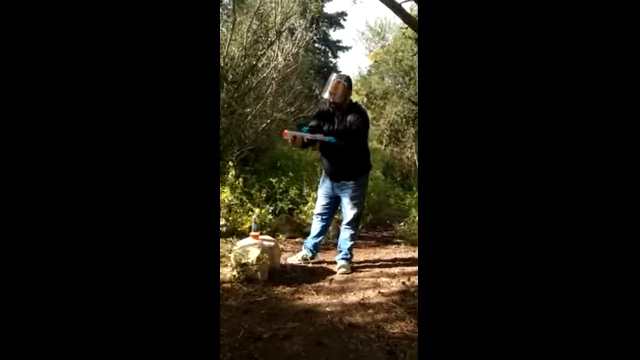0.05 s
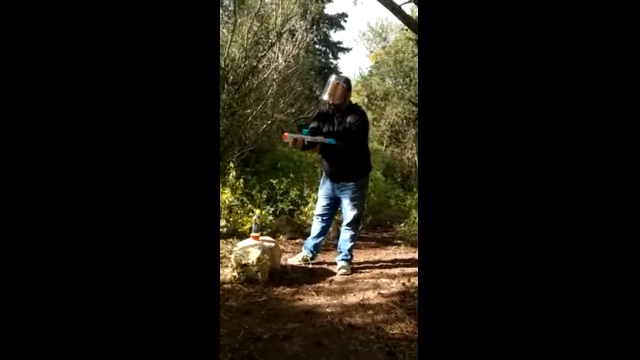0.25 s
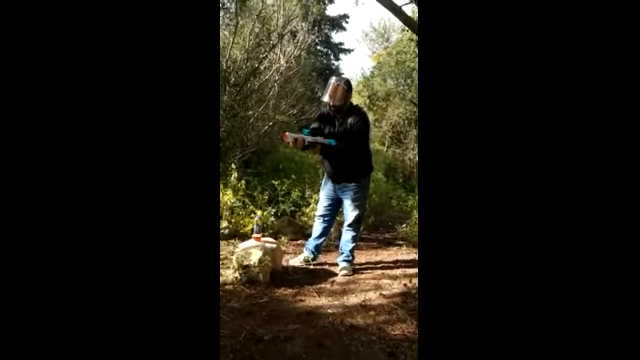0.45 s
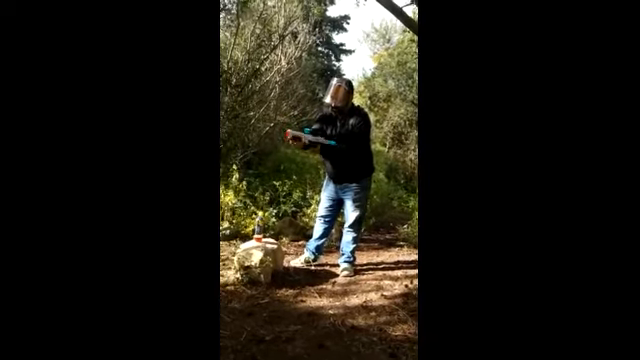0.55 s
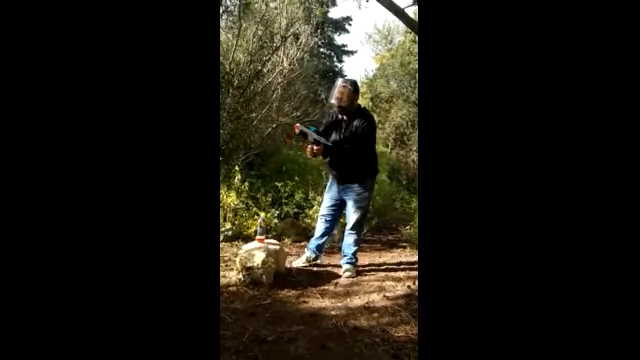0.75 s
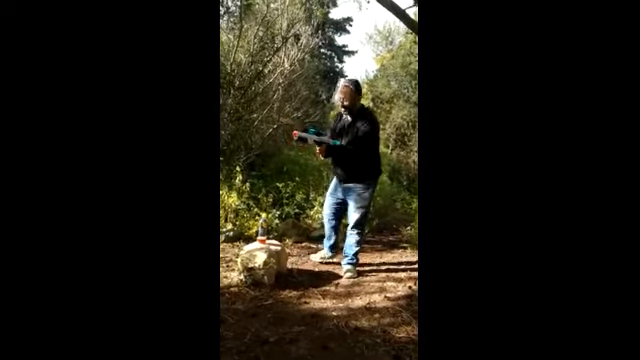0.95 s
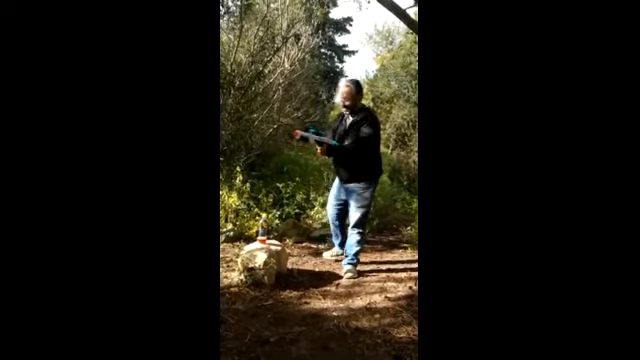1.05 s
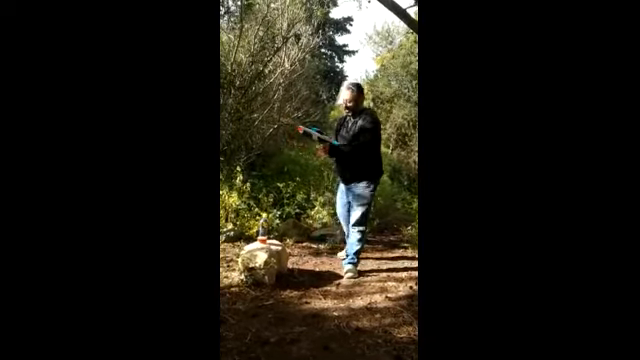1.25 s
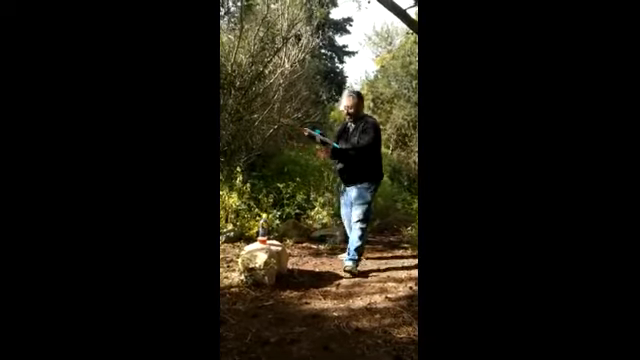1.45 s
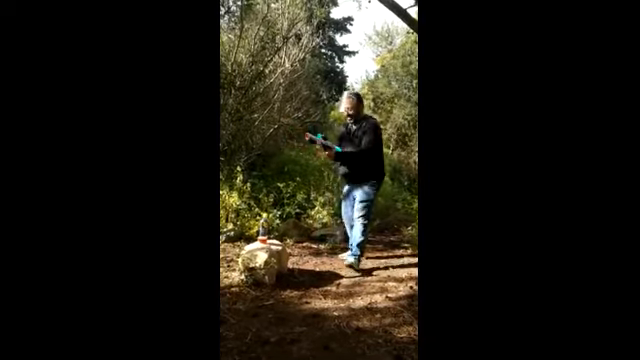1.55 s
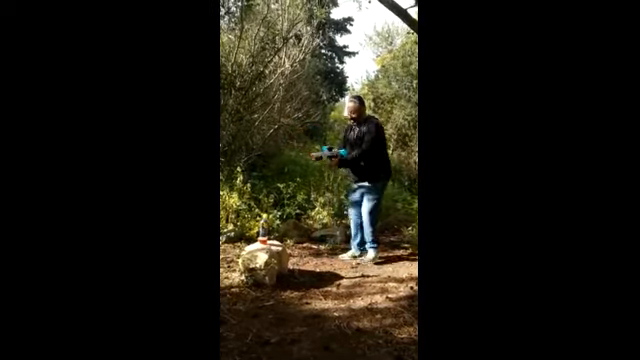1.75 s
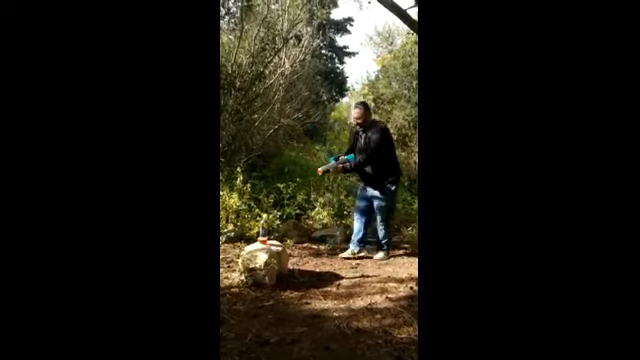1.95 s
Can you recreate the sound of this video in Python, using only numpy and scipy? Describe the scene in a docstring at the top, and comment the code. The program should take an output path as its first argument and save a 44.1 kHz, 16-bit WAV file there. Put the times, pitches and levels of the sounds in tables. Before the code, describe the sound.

A plastic toy shotgun is worked outdoors. Small clicks at 0.1 s lead to a bright latch snap at 0.32 s, then light clicks to 0.56 s. A hard slam at 0.78 s rattles until 0.85 s; softer hollow knocks follow around 1.0 and 1.35 s. Dry ticks come near 0.08, 1.13 and 1.6 s. Wind rumbles mainly left, over faint leaf hiss and bird chirps near 0.6 and 1.65 s.

```python
"""Impact and scattering of a toy shotgun in a garden

A plastic toy shotgun is loaded and worked: a latch snaps, the action slams shut, loose parts rattle.
Each impact is decaying noise with a contact spectrum; damped modes ring the hollow shell and knock the grip,
and a noise tail scatters each snap from the trees. Gust-shaped noise buffets mainly the left microphone port,
with pressure thumps and small dry ticks close by; a faint bird of gliding sines chirps over leaf hiss."""
import sys
import numpy as np
from scipy import signal
from scipy.fft import rfft, irfft
from scipy.io import wavfile
from scipy.ndimage import uniform_filter1d

SR = 44100
rng = np.random.default_rng(int(sys.argv[2]) if len(sys.argv) > 2 else 0)


def master(y):
    """Save y as 16-bit WAV."""
    cut = np.clip(np.atleast_2d(y).T, -1, 1)
    pcm = np.round(cut * 32767)  # scale
    wavfile.write(sys.argv[1], SR, pcm.astype(np.int16))


N = 88200
T, HZ = np.arange(N) / SR, np.fft.rfftfreq(N, 1 / SR)

# Hiss of leaves: spectrum (frequency [Hz], relative level [dB])
LEAVES_SPECTRUM = [(30, 7.5), (150, 4), (300, -3), (480, 0), (4800, -10.5), (6500, -14.5), (15500, -19)]
# Course of the hiss (time [s], level [dB])
LEAVES_LEVEL = [(0, -49.5), (.5, -52.5), (1.85, -52), (1.97, -55.5)]
# Likeness of the hiss in the two channels (frequency [Hz], left-right correlation [-1 to 1])
LEAVES_LIKENESS = [(100, 0.71), (700, 0.67), (1500, 0.15), (3200, -0.46), (6000, 0.68), (12000, 1)]
LEAVES_BALANCE_DB = 0.5  # left minus right

# Wind on each port (time [s], left level [dB], right level [dB])
GUST_LEVELS = [(0, -27.5, -41), (.12, -38.5, -52), (0.218, -27, -43), (.32, -33.5, -46), (.42, -31.5, -45),
               (.55, -28, -45), (0.691, -29.5, -48), (.73, -38, -38.5), (.79, -30.5, -43.5),
               (0.942, -43.5, -44), (1.048, -27.5, -45.5), (1.15, -44.5, -51), (1.22, -29, -42),
               (1.28, -36, -50), (1.33, -33, -36), (1.46, -42.5, -47.5), (1.551, -38, -34),
               (1.64, -44, -47), (1.88, -41, -45.5), (2., -49.5, -49)]
# Spectrum of the eddies at the reference level (frequency [Hz], relative level [dB])
WIND_SPECTRUM = [(10, -8), (25, -3.5), (50, 1), (80, -5), (120, -9), (170, -26.5), (250, -43), (400, -50),
                 (1000, -97), (3000, -101)]
WIND_REFERENCE_DB, WIND_OCTAVES_PER_DB = -30, 0.1047  # stronger gusts make smaller, faster eddies
# Single thumps of air or grip on the microphone
# (time [s], level [dB], time scale [s], left minus right [dB])
PRESSURE_THUMPS = [(.42, -31.5, 0.0053, 12), (.678, -32, 0.0084, 20), (1.0915, -30, 0.0034, 17.5)]

# Decay of the scatter (frequency [Hz], 60 dB decay time [s])
TREES_DECAY = [(800, 0.25), (15000, 0.21)]
# Spectrum sent out in all directions and scattered back (frequency [Hz], relative level [dB])
TREES_SPECTRUM = [(100, -45), (300, -21), (500, -20), (750, -11), (1200, -7), (1700, -10.5), (2200, -1),
                  (3400, -8.5), (4800, -6), (7500, -7.5), (10000, -11), (15000, -18.5)]
# Likeness of the scatter in the two channels (frequency [Hz], left-right correlation [-1 to 1])
TREES_LIKENESS = [(200, 0.61), (1400, 0.7), (3100, 0), (6500, 1), (12000, 1)]
TREES_PATCHY_DB, TREES_ONSET_S = 3, 0.0023  # rms unevenness, build-up time

# Bird notes (time [s], length [s], start frequency [Hz], end frequency [Hz], level [dB], waver [Hz])
BIRD_NOTES = [(0.589, 0.022, 4800, 4150, -51, 150), (0.616, 0.024, 4480, 3760, -51.5, 150),
              (0.643, 0.032, 4100, 3710, -54.5, 400), (1.639, .05, 4710, 4270, -57.5, 590),
              (1.673, 0.062, 4500, 3890, -58, 990)]
BIRD_SCATTER_DB = 5

# Dry ticks close to the microphone (time [s], level [dB], ring frequency [Hz], ring 60 dB decay time [s],
# crack relative level [dB], thud relative level [dB], left minus right [dB])
DRY_TICKS = [(0.0787, -25.5, 1680, 0.0095, -18, -16, 8), (1.1013, -39.5, 797, 0.028, -9, -8, 5),
             (1.1010, -40, 310, 0.031, -28, -10, -1), (1.1346, -30, 7170, 0.0085, -9, -12.5, 10),
             (1.6043, -29.5, 1276, 0.013, -24, -4.5, 5), (1.6463, -41, 905, 0.0082, -24, -5, 17),
             (1.724, -36, 1230, 0.0063, -18, -2, 1)]
TICK_RISE_S, CRACK_T60_S = 0.0005, 0.008

# Knocks of the sliding grip (time [s], level [dB], tilt [dB per octave])
GRIP_KNOCKS = [(0.3735, -48, -2), (1.009, -44.5, -4), (1.0134, -42, -2), (1.0205, -40, -8),
               (1.033, -43.5, 5), (1.321, -43.5, -2), (1.3566, -45, 1), (1.365, -42.5, -3), (1.381, -49, 1)]
# Low modes of the hollow body, struck by the grip (frequency [Hz], relative level [dB], 60 dB decay time [s])
BODY_MODES = [(747, -2, 0.045), (962, -1, 0.032), (1155, 2, 0.031), (2056, -3.5, 0.047)]

# Plastic parts striking each other (time [s], relative level [dB], time to fall 60 dB [s],
# sound from latch to slam [0 to 1], tilt [dB per octave], scatter relative level [dB])
IMPACTS = [(0.1112, -1, 0.023, 0.54, -3, -6.5), (0.154, -9, 0.018, 0.4, -2.5, -12),
           (0.3195, 2.5, 0.014, 0.87, 1, -17), (0.3225, 20, 0.018, 0.017, 0.5, -14),
           (0.3375, -3, .012, .1, 1, -8), (0.374, -7.5, 0.022, 0.44, -3.5, -19),
           (0.4695, -8, 0.017, 0.21, -3.5, -12), (0.531, -8, 0.035, 0.25, -5.5, -10),
           (0.5602, 0.5, 0.03, 0.073, 0, -11), (0.711, -8.5, 0.073, 0.12, -4, -3),
           (0.7397, 6, .018, 0.46, -3, -5.5), (0.7650, 5, 0.048, 0, -2, 3),
           (.7758, 22, 0.018, 0.85, 1.5, -10), (.7776, 19, 0.017, 0.94, -1, -6),
           (0.798, 6, 0.01, 0.7, 1, -6), (0.8022, 3.5, 0.02, 0.6, 0.5, -5),
           (0.809, 1, 0.02, .7, -0.5, -4.5), (0.824, -2, 0.012, .5, -0.5, -3),
           (0.8337, -1.5, 0.017, 0.75, 0.5, -3), (0.8393, -3, .012, 0.63, -1, -4.5),
           (0.8494, -7, 0.011, 0.63, -1, -6), (1.009, -3.5, 0.03, 0.43, -3.5, -6),
           (1.0134, -1, 0.028, 0.42, -1, -4.5), (1.02, -1.5, 0.032, .3, 0, -6),
           (1.0313, -4.5, 0.03, 0.31, -5, -9), (1.0552, -3.5, 0.014, 0.43, -1, -6),
           (1.0705, -8.5, 0.025, 0.3, 1, -18), (1.318, -13, 0.033, 0.53, -0.5, -1),
           (1.323, -11.5, .025, 0.6, -1.5, -4.5), (1.3515, -6, 0.03, 0.34, 0.5, -2.5),
           (1.3575, -6.5, .02, 0.48, -3, -5), (1.3634, 1.5, 0.024, 0.31, -1.5, -9),
           (1.406, -9.5, .030, 0.43, -3.5, -14)]
# Spectrum of the latch contact (frequency [Hz], level [dB])
LATCH_SPECTRUM = [(100, -20.5), (400, -25), (550, -39), (720, -11.5), (900, -25), (1170, -6), (1550, -27.5),
                  (1900, -12), (2240, 1), (2550, -15), (2950, -3), (3900, -8), (4570, 3.5), (5000, -7),
                  (5500, -4.5), (6100, -13.5), (7500, -16), (11000, -18.5), (15500, -26)]
# Spectrum of the slam contact (frequency [Hz], level [dB])
SLAM_SPECTRUM = [(100, -7), (300, -28.5), (500, -25), (700, -15), (1000, -12.5), (1280, 2), (1530, -2),
                 (1750, -6.5), (2000, -4), (2300, -5.5), (2850, 3), (3300, -17), (3900, -9.5), (4500, -5),
                 (5200, -12), (7700, -8.5), (9000, -16.5), (12000, -14.5), (15500, -19)]
STRIKE_RISE_SHARE = 0.015  # rise as a share of the impact's length
BOUNCES_PER_S, BOUNCE_DB, BUZZ_DB = 2500, 2, -6  # mean rate, rms unevenness, buzz against bounces
# Modes of the hollow shell
# (frequency [Hz], relative level [dB], 60 dB decay time [s], left minus right [dB])
SHELL_MODES = [(727, -1, .16, 0), (915, 4, .2, -6), (1235, 5, .22, 0), (1529, 0, .2, 0), (1830, -2, .16, 2),
               (2165, 4, .19, 7), (2455, 0, .17, 0), (2780, -2, .15, 0), (3850, -3, .17, 0),
               (4960, -1, .18, 0), (5895, 1, .17, 0), (6970, -1, .16, 0), (7620, 0, .18, 0),
               (8480, -1, .2, 0)]
SHELL_DB, SLAM_RING_DB = -5, 6.5  # a full slam rings the shell harder than the latch
# Balance of the direct sound (frequency [Hz], left minus right [dB])
DIRECT_LEVEL_DIFFERENCE = [(300, 1.5), (700, -2), (1250, -1), (1600, 1), (2400, 5), (4400, 4), (8000, -14),
                           (11000, -4), (15000, -1)]
# Delay of the direct sound at the left port (frequency [Hz], delay [ms])
LEFT_DELAY = [(700, 0.11), (5800, .16), (7500, 0.242), (15000, 0.144)]

EDGE_HZ = 16150  # upper band limit


def amp(db):
    """Decibels to amplitude gain: 20 dB is a factor of ten."""
    return 10 ** (np.asarray(db) / 20)


def evened(x):
    """Scales to unit rms, the root of the mean power."""
    return x / np.sqrt(np.mean(x ** 2) + 1e-20)


def read(points, hz):
    """Interpolates a table linearly over log frequency."""
    f, value = np.transpose(points)
    return np.interp(np.log(hz + 1), np.log(f + 1), value)


def add(mix, s, sound):
    """Superposes a sound on the mix at time s."""
    part = mix[..., round(s * SR):][..., :sound.shape[-1]]
    part += sound[..., :part.shape[-1]]


def panned(balance_db):
    """Left and right gains, each taking half of a level difference."""
    return amp(np.array([[0.5], [-0.5]]) * balance_db)


def causal(db):
    """Minimum phase: the Hilbert transform of log gain gives the phase, so nothing precedes the hit."""
    log_gain = np.log(amp(np.concatenate([db, db[-2:0:-1]])))
    return np.exp(np.conj(signal.hilbert(log_gain)))[:len(db)]


def noise_pair(colour_db, alike):
    """Partial correlation: the second channel blends the first with independent noise at constant power."""
    first, independent = rfft(rng.standard_normal((2, N)))
    likeness = np.clip(read(alike, HZ), -1, 1)
    second = likeness * first + np.sqrt(1 - likeness ** 2) * independent
    return irfft(np.array([first, second]) * amp(colour_db), N)


def leaves():
    """Broadband noise, spectrally shaped and slowly varying in level: the soft hiss of the garden."""
    hiss = evened(noise_pair(read(LEAVES_SPECTRUM, HZ), LEAVES_LIKENESS))
    level_db = np.interp(T, *np.transpose(LEAVES_LEVEL))
    return hiss * amp(level_db) * panned(LEAVES_BALANCE_DB)


def wind():
    """Turbulent pressure, independent at each port: its spectrum moves up in frequency in the gusts."""
    s, *ports = np.transpose(GUST_LEVELS)
    out = []
    for port_db in ports:
        hz, t, z = signal.stft(rng.standard_normal(N), SR, nperseg=4096, noverlap=3072)
        speed = 2 ** (WIND_OCTAVES_PER_DB * (np.interp(t, s, port_db) - WIND_REFERENCE_DB))
        z = z * amp(read(WIND_SPECTRUM, hz[:, None] / speed))
        eddies = signal.istft(z, SR, nperseg=4096, noverlap=3072)[1][:N]
        # level the local power, then impose the gusts
        steady = eddies / np.sqrt(uniform_filter1d(eddies ** 2, size=4000) + 1e-20)
        out.append(steady * amp(np.interp(T, s, port_db)))
    return np.array(out)


def thumps():
    """Pressure impulse: one push and one rebound under an exponential decay."""
    out = np.zeros((2, N))
    for s, db, width, balance_db in PRESSURE_THUMPS:
        u = T[:N // 20] / width
        pulse = 2 * u * (2 - u) * np.exp(-u)
        add(out, s, amp(db) * pulse * panned(balance_db))
    return out


def trees(x):
    """Multiple scattering from trunks, leaves and ground: convolution with an uneven, decaying noise tail."""
    hz, t, z = signal.stft(noise_pair(0 * HZ, TREES_LIKENESS), SR, nperseg=256)
    uneven = uniform_filter1d(rng.standard_normal(z.shape[1:]), size=12, axis=0)
    decay_db = -60 * t / read(TREES_DECAY, hz)[:, None]
    z = z * amp(TREES_PATCHY_DB * evened(uneven) + decay_db)
    tail = signal.istft(z, SR, nperseg=256)[1][:, :N]
    tail = tail * np.minimum(T / TREES_ONSET_S, 1) ** 2
    tail = tail / np.linalg.norm(tail[0])
    tail = irfft(rfft(tail) * causal(read(TREES_SPECTRUM, HZ)), N)
    return signal.fftconvolve(x[None], tail, axes=1)[:, :N]


def bird():
    """Frequency modulation: faint notes glide downward with a random waver, blurred by the trees."""
    song = np.zeros(N)
    for s, length, start_hz, end_hz, db, waver_hz in BIRD_NOTES:
        u = np.arange(0, length, 1 / SR) / length
        waver = evened(uniform_filter1d(rng.standard_normal(N), size=60))[:len(u)]
        hz = start_hz + (end_hz - start_hz) * u + waver_hz * waver
        swell = np.sin(np.pi * u) ** 0.5
        add(song, s, amp(db) * swell * np.sin(2 * np.pi * np.cumsum(hz) / SR))
    return song + amp(BIRD_SCATTER_DB) * trees(song)


def ticks():
    """Damped oscillation close by: one ring, a dull thud an octave below and a brief noise crack."""
    out, t = np.zeros((2, N)), T[:N // 20]
    for s, db, hz, t60, crack_db, thud_db, balance_db in DRY_TICKS:
        thud = amp(thud_db) * np.sin(np.pi * hz * t)
        ring = (np.sin(2 * np.pi * hz * t) + thud) * amp(-60 * t / t60)
        noise = evened(uniform_filter1d(rng.standard_normal(len(t)), size=2))
        crack = noise * amp(crack_db - 60 * t / CRACK_T60_S)
        rise = np.minimum(t / TICK_RISE_S, 1)
        add(out, s, amp(db) * (ring + crack) * rise * panned(balance_db))
    return out


def knocks():
    """Modal superposition: the sliding grip bumps along the barrel, exciting a few short, hollow modes."""
    out, t = np.zeros((2, N)), T[:N // 10]
    all_phases = rng.random((len(GRIP_KNOCKS), len(BODY_MODES)))
    pivot_hz = BODY_MODES[1][0]  # the tilt leaves this mode unchanged
    for (s, db, tilt_db), phases in zip(GRIP_KNOCKS, all_phases):
        ring = np.zeros(len(t))
        for (hz, mode_db, t60), phase in zip(BODY_MODES, phases):
            decay = amp(mode_db + tilt_db * np.log2(hz / pivot_hz) - 60 * t / t60)
            ring += decay * np.sin(2 * np.pi * (hz * t + phase))
        add(out, s, amp(db) * ring * np.minimum(t / TICK_RISE_S, 1))
    return out


def chatter(length, size=8192):
    """Repeated contact: decaying uneven bounces and buzz; returns their spectrum, flattened."""
    t = np.arange(size) / SR
    buzz, uneven, kicks = rng.standard_normal((3, size))
    bounces = evened(kicks * (rng.random(size) < BOUNCES_PER_S / SR))
    grain = bounces + amp(BUZZ_DB) * buzz
    uneven_db = BOUNCE_DB * evened(uniform_filter1d(uneven, size=30))
    rise = np.minimum(t / (STRIKE_RISE_SHARE * length), 1)
    z = rfft(grain * rise * amp(uneven_db - 60 * t / length))
    return z / np.sqrt(uniform_filter1d(abs(z) ** 2, size=50) + 1e-12)


def shell(x):
    """Modal resonance: each blow sets the damped modes of the hollow plastic body ringing."""
    t, phases = T[:N // 4], rng.random((len(SHELL_MODES), 2, 1))
    ring = np.zeros((2, len(t)))
    for (hz, db, t60, balance_db), phase in zip(SHELL_MODES, phases):
        # this factor makes the gain at resonance independent of the decay time
        resonance_scale = 2 * np.log(1000) / (t60 * SR)
        mode = np.sin(2 * np.pi * (hz * t + phase)) * amp(db - 60 * t / t60)
        ring += resonance_scale * mode * panned(balance_db)
    return amp(SHELL_DB) * signal.fftconvolve(x[None], ring, axes=1)[:, :N]


def gun(size=8192):
    """Impact radiation: plastic parts strike, reaching the right port first; shell and trees respond."""
    hz = np.fft.rfftfreq(size, 1 / SR)
    direct, spread, blows = np.zeros((3, N))
    octaves = np.log2(np.maximum(hz, 300) / 3000)  # tilt pivots at 3 kHz and stops below 300 Hz
    for s, db, length, slam, tilt_db, scatter_db in IMPACTS:
        contact = amp(db) * causal(tilt_db * octaves)
        colour = causal((1 - slam) * read(LATCH_SPECTRUM, hz) + slam * read(SLAM_SPECTRUM, hz))
        snap = irfft(contact * chatter(length) * colour)[:size // 2]
        scattered = irfft(contact * chatter(length))[:size // 2]
        blow = irfft(contact)[:size // 2]
        add(direct, s, snap)
        add(spread, s, amp(scatter_db) * scattered)
        add(blows, s, amp(scatter_db + SLAM_RING_DB * slam) * blow)
    balance_db = read(DIRECT_LEVEL_DIFFERENCE, HZ)
    lag_s = read(LEFT_DELAY, HZ) / 1000
    left = amp(balance_db / 2) * np.exp(-2j * np.pi * HZ * lag_s)
    right = amp(-balance_db / 2)
    return irfft(rfft(direct) * np.array([left, right]), N) + trees(spread) + shell(blows)


def scene():
    """Linear superposition: the toy gun in the breezy garden."""
    return gun() + knocks() + ticks() + wind() + thumps() + leaves() + bird()


def record(dry):
    """Saturation at full scale, then a linear-phase low-pass band limit."""
    lowpass = signal.firwin(301, EDGE_HZ, window=("kaiser", 7), fs=SR)
    return signal.oaconvolve(np.clip(dry, -1, 1), lowpass[None], "same")


dry = scene()
out = record(dry)
master(out)
```